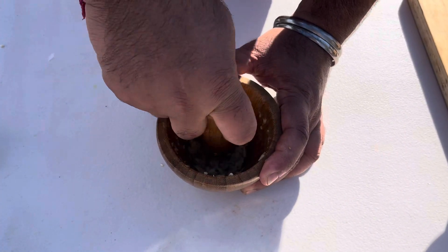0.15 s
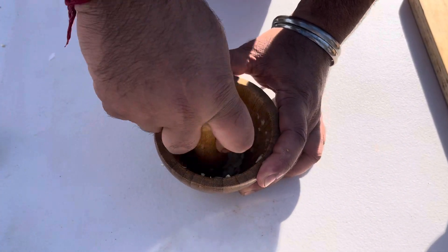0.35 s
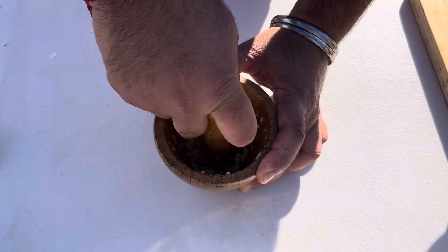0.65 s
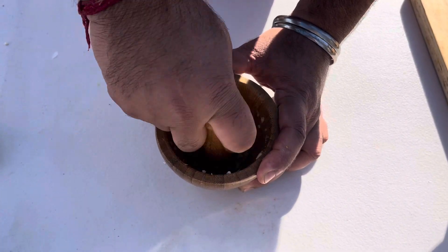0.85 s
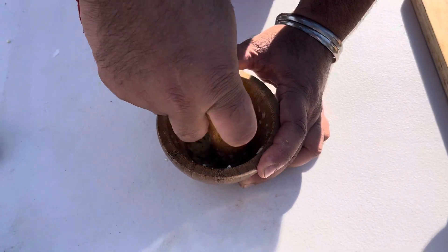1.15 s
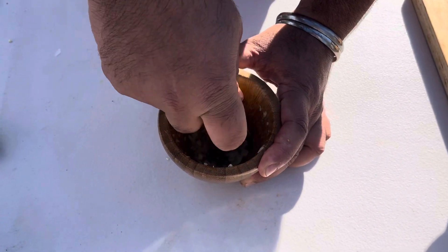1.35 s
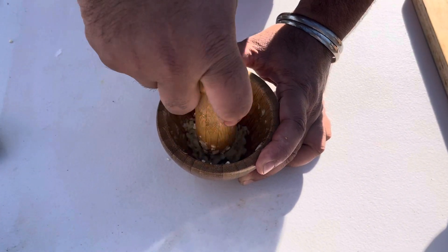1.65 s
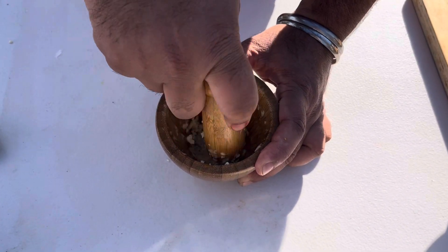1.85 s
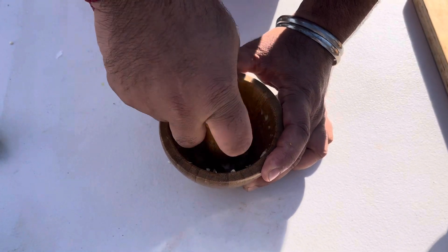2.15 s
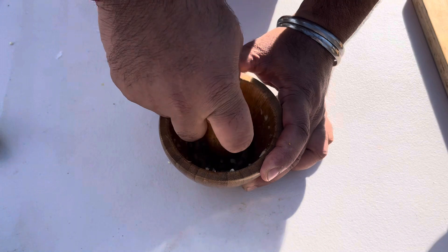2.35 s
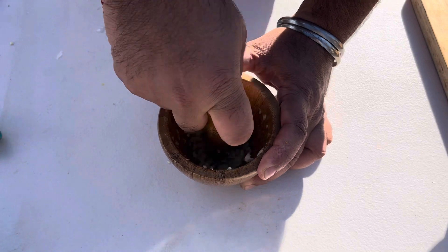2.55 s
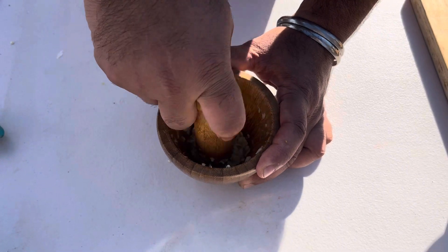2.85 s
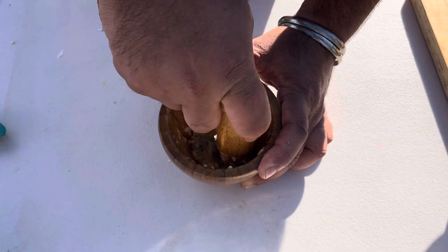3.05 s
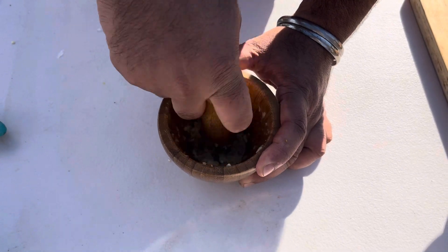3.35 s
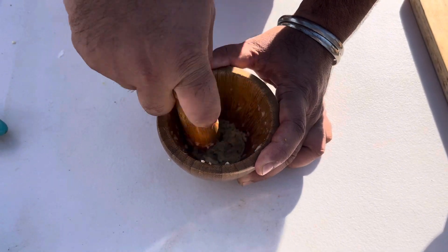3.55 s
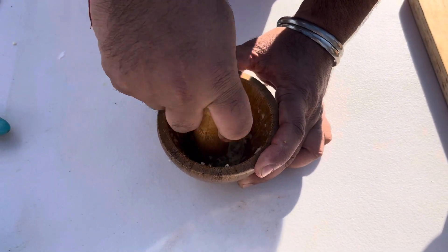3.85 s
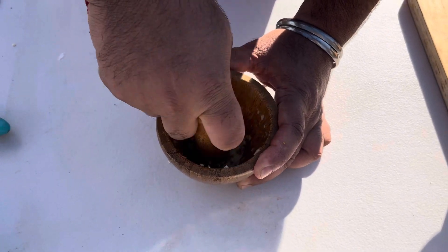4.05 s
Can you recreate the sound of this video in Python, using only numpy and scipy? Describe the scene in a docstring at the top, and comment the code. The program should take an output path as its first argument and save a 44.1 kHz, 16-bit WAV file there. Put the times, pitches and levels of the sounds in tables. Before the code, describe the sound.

Close, steady pounding, nearly five blows a second: deep table thuds, gritty crunches, occasional woody clacks and tiny metallic tinkles outdoors.

```python
"""Pestle pounding food in a wooden mortar

A wooden pestle pounds food in a small mortar on a light table outdoors, close to a two-port microphone.
Each blow lands twice, on the food and then at the bottom: damped swings and short wood modes thump the
table, which trembles on as shaped noise. The food crunches and grinds as grains of noise through bowl
resonances. The pestle also knocks on the rim (short modes and a crack), and metal bangles on the holding
wrist chime faintly (longer modes). Behind it lie a low rumble and one faint tone."""
import sys
import numpy as np
from scipy import signal
from scipy.fft import rfft, irfft, next_fast_len
from scipy.io import wavfile

SR = 44100
rng = np.random.default_rng(int(sys.argv[2]) if len(sys.argv) > 2 else 0)


def materialize(psi):
    """Save the field psi as 16-bit PCM at rate SR to the path in sys.argv[1].

    A 1-D psi becomes a single channel; in a 2-D psi each row is a channel.
    """
    bounded = np.clip(np.atleast_2d(psi).T, -1, 1)
    quanta = np.round(bounded * 32767).astype(np.int16)
    wavfile.write(sys.argv[1], SR, quanta)


def gain_from_db(level_db):
    """Turn a decibel level (scalar or array-like) into a linear amplitude factor."""
    decades = np.asarray(level_db, float) / 20
    return 10 ** decades


N = 185423
FFT_SIZE = next_fast_len(N + 4096)
HZ = np.fft.rfftfreq(FFT_SIZE, 1 / SR)
TIME = np.arange(N) / SR


def curve(points):
    """A table over frequency, joined on a log axis."""
    hz, value = np.transpose(points)
    return np.interp(np.log(HZ + 1), np.log(hz + 1), value)


def coloured(x, response):
    """Applies a frequency response."""
    return irfft(rfft(x, FFT_SIZE) * response, FFT_SIZE)[..., :N]


def noise(response):
    """Two unrelated strands of coloured noise, rms 1."""
    x = coloured(rng.standard_normal((2, N)), response)
    return x / x.std()


def add(mix, start_s, sound):
    """Mixes a sound in at its start time."""
    part = mix[..., round(start_s * SR):][..., :sound.shape[-1]]
    part += sound[..., :part.shape[-1]]


def ring(modes, scatter_db, tilt_db=0):
    """One strike on a set of decaying modes, peak 1 in the first strand; tilt_db lifts those above 2.2 kHz."""
    t = np.arange(round(.4 * SR)) / SR
    sound = np.zeros((2, len(t)))
    for hz, db, t60_s in modes:
        chance, phase_1, phase_2 = rng.standard_normal(3)
        level_db = db + scatter_db * chance + tilt_db * (hz > 2200) - 60 * t / t60_s
        phase = 0.62 * np.array([[phase_1], [3 * phase_2]])
        sound += gain_from_db(level_db) * np.sin(2 * np.pi * hz * t + phase)
    sound *= 1 - np.exp(-t / 0.0013)  # soft contact
    return sound / abs(sound[0]).max()


# colour of the outdoor background: hz, level_db
AIR_COLOUR = [(26, -24), (52, -6), (86, 0), (132, -4), (225, -19), (510, -32), (710, -41), (1120, -37),
              (1620, -48), (2520, -46), (3300, -63), (12000, -75)]
AIR_DB = -36  # rms
TONE_HZ, TONE_DB = 1272, -61  # rms


def outdoors():
    """Low rumble of the surroundings as shaped noise, and one faint steady sine."""
    out = AIR_RUMBLE = gain_from_db(AIR_DB) * noise(gain_from_db(curve(AIR_COLOUR)))
    out[0] += gain_from_db(TONE_DB) * np.sqrt(2) * np.sin(2 * np.pi * TONE_HZ * TIME)
    return out


# the hand leans on the pestle, then lifts it: start_s, lean_s, grind_db, grind_at_lift_db, tremble_db
LEANS = [(0.0, 0.016, -23, -34.5, -25), (0.159, 0.088, -25.5, -38.5, -19.5),
         (0.351, .2, -36.5, -55.5, -26.5), (.595, 0.13, -59, -51.5, -42.5), (0.909, 0.091, -31, -38.5, -23),
         (1.119, 0.076, -26, -39.5, -20.5), (1.334, 0.075, -34, -35.5, -20.5),
         (1.549, 0.079, -27, -42, -23), (1.765, 0.098, -28, -47.5, -24.5), (1.965, 0.072, -29, -34, -17.5),
         (2.175, 0.088, -21, -33.5, -14.5), (2.383, 0.098, -16, -33, -12.5),
         (2.6, 0.081, -25.5, -32, -17.5), (2.819, 0.09, -22.5, -35.5, -19.5),
         (3.024, 0.056, -17, -34, -15.5), (3.215, 0.063, -24, -30, -17), (3.423, 0.089, -27.5, -28, -15.5),
         (3.635, 0.079, -44, -40.5, -24.5), (3.833, 0.085, -21, -34, -15.5), (4.043, .085, -19, -35, -15.5)]
GRIND_RISE_DB_PER_S, LIFT_DB_PER_S = 1501, 552
SETTLE_DB, SETTLE_TREBLE_DB, SETTLE_DB_PER_S = -6, -5.5, 121  # crumbs settle after the lift
TREMBLE_RISE_DB_PER_S, TREMBLE_LEAN_DB_PER_S, TREMBLE_FREE_DB_PER_S = 1004, 118, 254
THROB_HZ, THROB_DB, THROB_LAG_S = 45.1, 2.5, .012  # the pestle rocks under the hand


def leaning():
    """Levels of grinding, its treble and tremble: each swells in, changes under the hand, dies after the lift."""
    power = np.zeros((3, N))
    for start_s, lean_s, grind_db, lift_db, tremble_db in LEANS:
        early = np.maximum(start_s - TIME, 0)
        held = np.clip(TIME - start_s, 0, lean_s)
        since_lift = np.maximum(TIME - start_s - lean_s, 0)
        pressed_db = grind_db + (lift_db - grind_db) * held / lean_s - GRIND_RISE_DB_PER_S * early
        throb_db = THROB_DB * np.cos(2 * np.pi * THROB_HZ * (TIME - start_s - THROB_LAG_S))
        lifted_db = throb_db - LIFT_DB_PER_S * since_lift
        settle_db = SETTLE_DB - SETTLE_DB_PER_S * since_lift
        grind = pressed_db + np.maximum(lifted_db, settle_db)
        treble = pressed_db + np.maximum(lifted_db, settle_db + SETTLE_TREBLE_DB)
        tremble = tremble_db - TREMBLE_RISE_DB_PER_S * early
        tremble = tremble - TREMBLE_LEAN_DB_PER_S * held - TREMBLE_FREE_DB_PER_S * since_lift
        power += gain_from_db([grind, treble, tremble]) ** 2
    return np.sqrt(power)


def thump(hz, lead, crest, order):
    """A soft push swings the table top: it builds up for a cycle and is damped at once; lead, crest in cycles."""
    cycles = np.arange(0, 6, hz / SR)
    swell = (cycles / crest * np.exp(1 - cycles / crest)) ** order
    return -swell * np.cos(2 * np.pi * (cycles - lead))


# the table's swing as the pestle lands on the food: time_s, level_db
LANDINGS = [(0.1282, -8), (0.316, -8), (0.879, 0.5), (1.088, -15), (1.302, -8.5), (1.5208, -6.5),
            (1.7321, -8), (1.9314, -2), (2.1415, -5.5), (2.3546, 2), (2.5675, -6), (2.787, -8),
            (2.9851, 0.5), (3.1838, -7), (3.3933, -10), (3.6025, -8), (3.803, -3.5), (4.009, -8.5)]
# the table's swing as the pestle bottoms out: time_s, level_db, pitch_hz
BOTTOMS = [(0.1427, -5.5, 97), (0.3315, -7, 95), (0.893, -7.5, 84), (1.105, -8, 92), (1.3175, -4, 91),
           (1.536, -5, 93), (1.7474, -4.5, 93), (1.9466, -6.5, 85), (2.1575, -7, 81.5), (2.369, -8.5, 83.5),
           (2.5839, -4.5, 83), (2.8028, -4.5, 91), (2.9994, -5, 79), (3.2, -4.5, 88), (3.4089, -3.5, 97),
           (3.62, -8.5, 92.5), (3.819, -5, 92), (4.0258, -5.5, 82)]
# modes of table and mortar together: pitch_hz, level_db, t60_s
WOOD = [(181.9, -0.5, 0.088), (252.8, -2, 0.085), (339, -6, 0.039), (529, -17.5, 0.23), (687, -21.5, 0.21),
        (840, -22, 0.043), (1052, -4.5, 0.023)]
# colour of the trembling table: hz, level_db
TREMBLE_COLOUR = [(25, -49), (50, -2.5), (110, -2), (200, 0), (300, -6.5), (500, -17.5), (700, -18.5),
                  (1070, -25.5), (2000, -26.5), (3000, -41.5)]
LANDING_HZ = 119.6
SAG_HZ, SAG_DB = 68.4, -1.7  # slowest swing of the table; level against the thump


def table(tremble):
    """Two thumps a blow, the second with a slow sag of the top; each rings the wood, and the top trembles on."""
    out = noise(gain_from_db(curve(TREMBLE_COLOUR))) * tremble
    for time_s, db in LANDINGS:
        add(out[0], time_s - 1.2 / LANDING_HZ, gain_from_db(db) * thump(LANDING_HZ, 1.2, 1.25, order=5))
        add(out, time_s - .013, gain_from_db(db - 10) * ring(WOOD, 2.5))
    for time_s, db, hz in BOTTOMS:
        add(out[0], time_s - .8 / hz, gain_from_db(db) * thump(hz, .8, .95, order=3))
        add(out[0], time_s - 0.844 / SAG_HZ, gain_from_db(db + SAG_DB) * thump(SAG_HZ, 0.73, 0.73, order=3))
        add(out, time_s - .011, gain_from_db(db - 5) * ring(WOOD, 1.7))
    return out


def grit(per_s, spread_db, decay_ms):
    """Envelope of many small fractures of very uneven size, mean power 1."""
    happens = rng.random(N) < per_s / SR
    sizes = gain_from_db(spread_db * np.minimum(rng.exponential(1, N), 4)) * happens
    power = signal.lfilter([1], [1, -np.exp(-1000 / (decay_ms * SR))], sizes ** 2)
    return np.sqrt(power / power.mean())


def burst(db, bright_db, body_db, crest_s):
    """Power of one burst below and above 6.5 kHz and in the wood, which sounds longer."""
    crests = crest_s * np.array([[1], [1], [1.6]])
    u = np.arange(round(.1 * SR)) / SR / crests
    levels = gain_from_db([[db], [db + bright_db], [db + body_db]])
    return ((u * np.exp(1 - u)) ** 0.81 * levels) ** 2


# bursts of cracking food: time_s, level_db, brightness_db and dull_body_db (both against level_db)
CRUNCHES = [(0.0097, -31, 4, -14), (0.132, -13.5, -0.5, -7), (0.191, -21.5, -8, -13.5),
            (0.3187, -17, -3.5, -7), (0.3335, -18, -4, -25), (.538, -45, 0, -10), (0.644, -41, 3.5, -8),
            (0.886, -7, -1.5, -12.5), (0.919, -25.5, 6, -9), (1.0937, -16.5, -1, -4.5),
            (1.155, -18, 1, -12), (1.3088, -7.5, -1.5, -14), (1.3455, -25, 1, -11.5),
            (1.3693, -21, -1, -8.5), (1.407, -33, 8.5, -22), (1.525, -11.5, -3, -10.5),
            (1.593, -24.5, -0.5, -18), (1.7369, -12, -4.5, -4.5), (1.7988, -17, -5.5, -16),
            (1.936, -6, 0, -8), (1.9606, -11, -7, -23), (2.018, -25, 1.5, -10.5), (2.148, -6.5, -1, -9.5),
            (2.2089, -14.5, -2, -19), (2.363, -8.5, -3, -10), (2.386, -13, -25, -8),
            (2.574, -4, -5.5, -11.5), (2.632, -26, 7.5, -22), (2.6653, -24, 7.5, -27),
            (2.7904, -9, -3, -7.5), (2.866, -27, 11, -10), (2.9912, -5, -0.5, -9),
            (3.018, -7.5, -1.5, -12.5), (3.1897, -9.5, 0.5, -8), (3.3971, -7, -5.5, -7.5),
            (3.4364, -28, -1, -21), (3.4585, -20, -3, -7), (3.607, -14, 3, -6), (3.6434, -28.5, 7, -5),
            (3.6656, -28.5, 2, -16), (3.688, -25.5, 4, -17), (3.8064, -10.5, 1.5, -4),
            (3.8317, -7, -8, -16), (3.884, -28, 0, 1), (4.0152, -4.5, -4, -12.5)]
# short ticks of the pestle meeting the food: time_s, level_db, dull_body_db (against level_db)
TOUCHES = [(0.1128, -29, -10.5), (0.3, -34, -6.5), (0.8674, -22.5, -0.5), (1.072, -27, -15),
           (1.2864, -24.5, -8.5), (1.5046, -20.5, -11), (1.7153, -21, -10), (1.917, -23, -1),
           (2.1261, -24, -4), (2.3423, -19.5, 3.5), (2.5526, -19.5, -5.5), (2.769, -23.5, -10),
           (2.9712, -20, -14), (3.1694, -24, -18), (3.3756, -16.5, -9), (3.5856, -24.5, -1.5),
           (3.7865, -21, -19), (3.9945, -24, -11)]
# colour of the cracking: hz, level_db
CRACKLE_COLOUR = [(1000, -14.5), (2000, -16.5), (3000, -2.5), (6000, -6), (9000, -9.5), (13500, -26),
                  (15500, -5), (17000, -52)]
# dull colour of the wooden mortar: hz, level_db
BODY_COLOUR = [(150, 0.5), (300, 4.5), (550, 5), (700, 3), (1080, -2), (1500, -4.5), (2200, -15),
               (4000, -29)]
# air and wall resonances of the bowl: pitch_hz, width_hz, level_db
BOWL = [(525, 25, 2.5), (688, 110, -2.5), (1068, 57, 0.5), (2815, 220, -4.5), (3400, 1200, -16.5),
        (4177, 265, -4), (5427, 300, -5), (6200, 154, -31), (7070, 193, -9.5), (7925, 280, -3),
        (8770, 460, -9.5), (9610, 260, -10.5), (9980, 590, -15.5), (11050, 440, -15.5), (11960, 500, -12),
        (13460, 430, -13)]
TOUCH_TREBLE_DB = -19.5  # the same for every touch


def food(pressure):
    """Bursts and grinding of small fractures; each resonance of bowl and wood is rung by its own grains."""
    power = np.zeros((3, N))
    for time_s, db, body_db in TOUCHES:
        add(power, time_s - .002, burst(db, TOUCH_TREBLE_DB - db, body_db, crest_s=.003))
    for time_s, *levels in CRUNCHES:
        add(power, time_s - .003, burst(*levels, crest_s=.0048))
    grind = pressure[[0, 1, 0]] * grit(900, 3.5, 2) * gain_from_db([[3], [2.5], [-9]])
    low, high, dull = np.sqrt(power * grit(2500, 2, 0.9) ** 2 + grind ** 2)

    out = dull * noise(gain_from_db(curve(BODY_COLOUR)))
    upper = 1 / (1 + (6500 / (HZ + 1)) ** 8)  # share of power in the upper band
    for level, share in ((low, 1 - upper), (high, upper)):
        crackle = level * rng.standard_normal((2, N))
        out += coloured(crackle, gain_from_db(curve(CRACKLE_COLOUR) + 1.5) * np.sqrt(share))
    for hz, width_hz, db in BOWL:
        level = dull if hz < 1500 else low if hz < 6500 else high
        grains = level * grit(200, 4.24, 5.8) * rng.standard_normal((2, N))
        out += coloured(grains, gain_from_db(db + 9.5) / (1 + 2j * (HZ - hz) / width_hz))
    return out


# bangles touching: start_s, level_db
CLINKS = [(.212, -39), (2.052, -34), (2.445, -17.5), (2.63, -21), (2.875, -29), (3.031, -21.5),
          (3.686, -33.5), (3.894, -22.5)]
# modes of a bangle: pitch_hz, level_db, t60_s
BANGLE = [(3161, 0, .32), (4211, -9, .14), (4957, -8, .16), (8772, -15, .13), (11112, -14, .14)]


def bangles():
    """Thin metal rings touch each other as the wrist is shaken, and their modes ring."""
    out = np.zeros((2, N))
    for start_s, db in CLINKS:
        add(out[0], start_s, gain_from_db(db) * ring(BANGLE, 1)[0])
    return out


# pestle against the rim: start_s, level_db, sharpness_db (treble of the ring; half of it goes to the crack)
KNOCKS = [(0.248, -32, -19), (0.9633, -24, -4), (1.489, -7.5, -3), (1.7027, -15, -6), (2.064, -18.5, -11),
          (2.276, -19.5, -16), (2.9017, -15.5, -21), (3.0668, -13, -9), (3.3715, -12.5, -2),
          (3.5718, -8.5, 4.5), (3.922, -22, -14.5), (4.136, -30, -27)]
# modes of the rim: pitch_hz, level_db, t60_s
RIM = [(970, -3.5, 0.016), (1267, 4.5, 0.022), (1440, 7, 0.022), (1728, 4, 0.014), (1857, -3, 0.018),
       (2330, -5.5, 0.019), (2685, -10.5, 0.023), (3100, -11.5, 0.03), (3260, -4.5, 0.018),
       (4070, -6, 0.011), (4600, -16, 0.0073)]


def rim():
    """Dry wooden knocks: short modes, a crack of noise, and a shove that rings the table."""
    out = np.zeros((2, N))
    t = np.arange(round(.05 * SR)) / SR
    band = signal.butter(2, [1000, 4000], "bandpass", fs=SR, output="sos")
    for start_s, db, sharp_db in KNOCKS:
        hiss = rng.standard_normal((2, len(t))) * gain_from_db(sharp_db / 2 - 60 * t / .035)  # falls 60 dB in 35 ms
        crack = signal.sosfilt(band, hiss)
        add(out[0], start_s, gain_from_db(db + 9) * ring(RIM, 0.72, sharp_db + 0.5)[0])
        add(out, start_s, gain_from_db(db + 3) * crack)
        add(out, start_s + 0.0039, gain_from_db(db - 5) * ring(WOOD, 5.4))
    return out


# likeness between the microphone ports: hz, likeness (0-1)
ALIKE = [(100, 0.96), (400, 0.93), (1200, 0.54), (3000, 0.33), (9000, 0.34), (10800, 0.7), (13000, 1),
         (13800, .6), (15000, 0.99)]
# phase by which the left port leads: hz, lead_rad
LEAD = [(0, 0), (1810, 3.6), (3190, 7.9), (4130, 6.4), (4910, 3.1), (6290, 4.5), (7490, 2.7), (7920, 4.2),
        (8790, 1.2), (9730, 1.1), (10700, 0.1), (13000, -0.0), (14200, -2.8), (16100, -3.2)]
# left port over right: hz, level_db
LOUDER = [(60, 1.5), (120, 1.5), (240, 1.0), (480, 3.0), (950, 5.0), (1890, 2.0), (3770, 0.5), (7520, -1.5),
          (15000, -0.5)]


def scene():
    """The left port hears the first strand, the right a blend of both; phase and level differ over frequency."""
    levels = leaning()
    first, second = outdoors() + table(levels[2]) + food(levels) + bangles() + rim()
    alike = np.clip(curve(ALIKE), 0, 1)
    lead_rad = np.interp(HZ, *np.transpose(LEAD))
    half = gain_from_db(curve(LOUDER) / 2) * np.exp(.5j * lead_rad)  # each port takes half the difference
    left = coloured(first, half)
    right = coloured(first, alike / half) + coloured(second, np.sqrt(1 - alike ** 2) / half)
    return np.array([left, right])


def band_limit(x):
    """A steep low-pass at the top of the band."""
    return signal.sosfilt(signal.butter(12, 16500, fs=SR, output="sos"), x)


def record(dry):
    """Soft limit of the converter, then the microphone's band edges near 29 Hz and 16 kHz."""
    limited = 1.18 * np.tanh(dry / 1.537)
    edge = 1 / (1 + (HZ / 16000) ** 60)
    edge = edge / (1 + (29 / (HZ + 1)) ** 4)
    mix = coloured(limited, edge)
    return band_limit(mix)


dry = scene()
out = record(dry)
materialize(out)
```